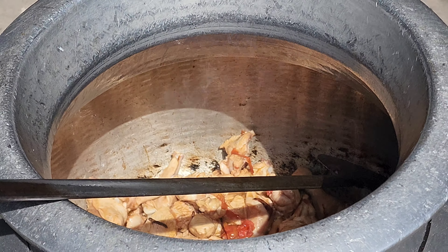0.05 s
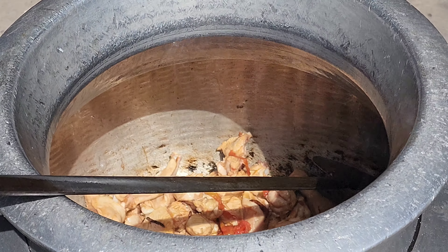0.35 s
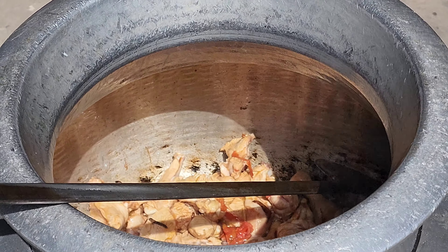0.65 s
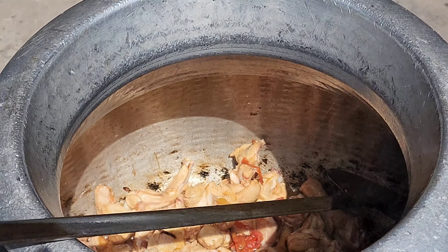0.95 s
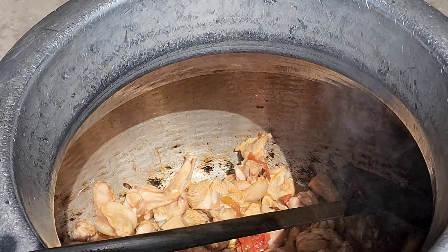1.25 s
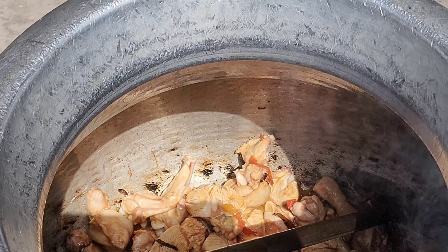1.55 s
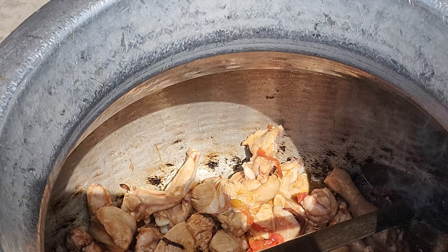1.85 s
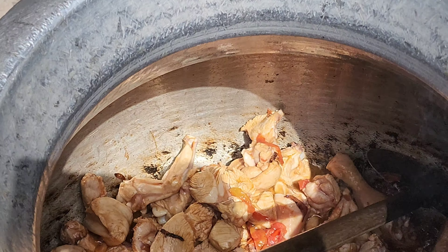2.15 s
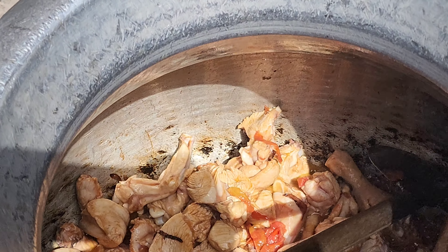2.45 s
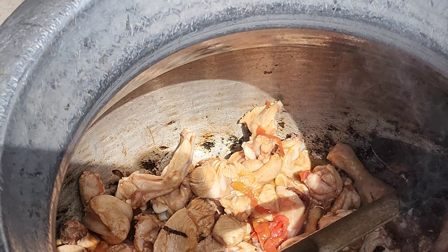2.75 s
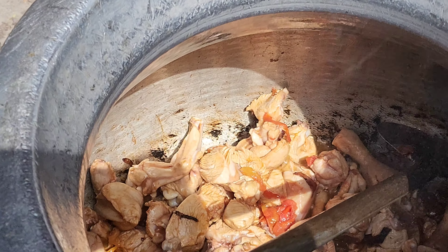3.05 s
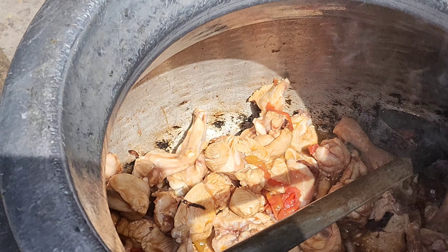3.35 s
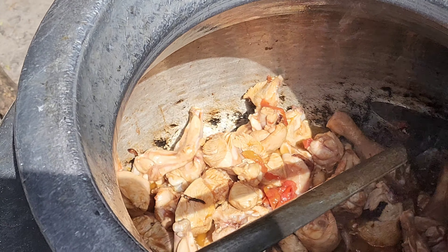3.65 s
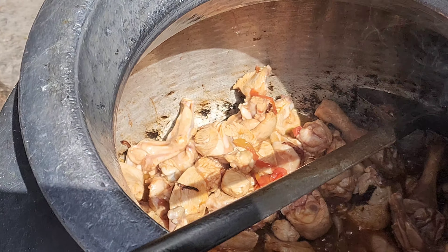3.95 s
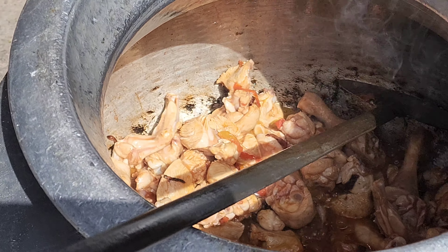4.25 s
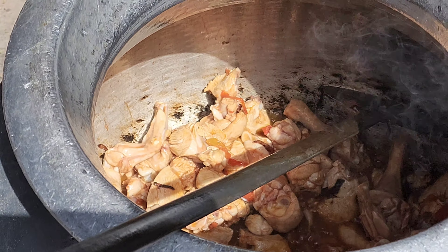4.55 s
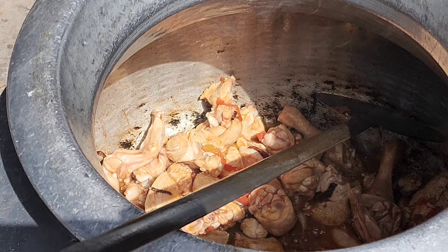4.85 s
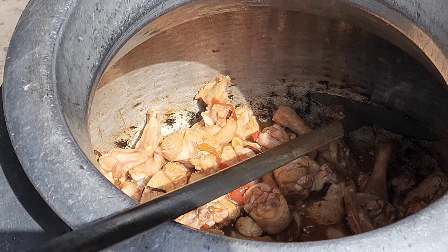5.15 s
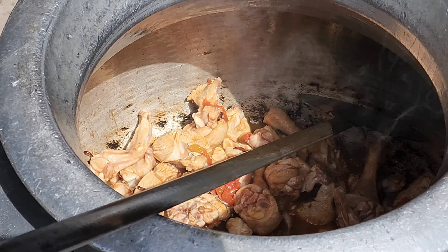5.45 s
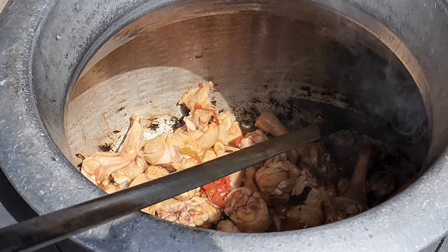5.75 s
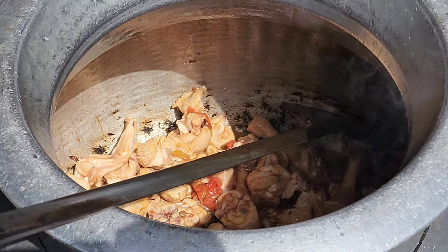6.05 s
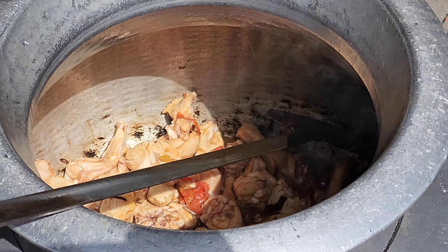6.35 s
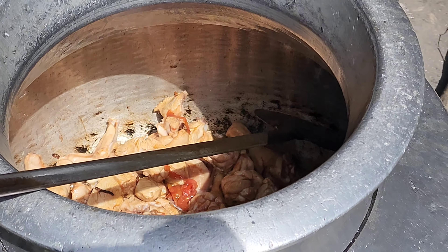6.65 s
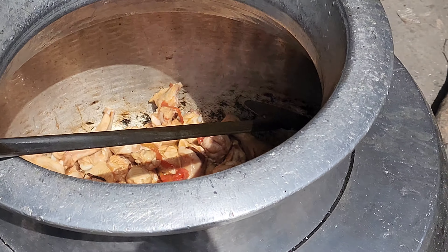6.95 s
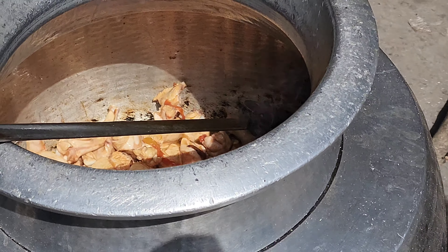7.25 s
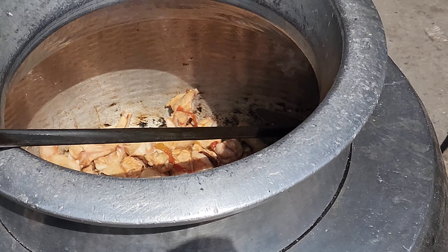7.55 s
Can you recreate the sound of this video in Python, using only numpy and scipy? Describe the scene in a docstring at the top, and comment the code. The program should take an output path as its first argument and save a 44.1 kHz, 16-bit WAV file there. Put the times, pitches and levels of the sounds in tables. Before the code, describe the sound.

Meat fries with a steady hiss and spit in a big metal pot over a rumbling gas burner, with distant engines droning.

```python
"""Frying at an outdoor stall

Meat fries in a big metal pot over a large gas burner; the microphone moves in over the rim and back.
Up close, steam bubbles in the fat hiss and spit, the flame rumbles, and the hollow of the pot rings.
A few soft bumps sound nearby. Down the street one engine drones and another slowly gathers speed."""
import sys
import numpy as np
from scipy import signal
from scipy.fft import rfft, irfft
from scipy.io import wavfile

SR = 44100
rng = np.random.default_rng(int(sys.argv[2]) if len(sys.argv) > 2 else 0)


def generate_wav(sig):
    """Save sig (samples, or channels by samples) to the path in sys.argv[1] as 16-bit PCM at SR."""
    pcm = np.round(np.clip(np.atleast_2d(sig).T, -1, 1) * 32767).astype(np.int16)
    wavfile.write(sys.argv[1], SR, pcm)


N = 344112
TIME = np.arange(N) / SR
FREQ = np.fft.rfftfreq(N, 1 / SR)
OVER_POT_S, OVER_POT_SPAN_S = 4.3, 9.3  # microphone over the pot: middle, span
IN_MOUTH_S, IN_MOUTH_SPAN_S = 2.43, 3.3  # microphone dipping into its mouth: middle, span


# The fat, loudest straight above the mouth: (time [s], hiss level [dB], relative top fizz [dB])
FRYING_LEVELS = [(0, -28, -1.5), (0.17, -29.5, -5.5), (0.25, -31.5, -10), (0.5, -29.5, -8.5),
                 (0.86, -26, -4), (1.05, -26, -3.5), (1.3, -25, -1.5), (2, -22.5, -2.5), (2.3, -22.5, -4),
                 (2.7, -22, -2.5), (3.9, -23.5, -2.5), (4.45, -25, -3.5), (4.75, -23.5, -2.5),
                 (5.2, -24.5, -2), (6.6, -25.5, -2), (6.88, -25, -9), (7.15, -28, -2), (7.45, -27, -3),
                 (7.73, -31, -7), (7.8, -28.5, -6)]
# The hiss at close range: (frequency [Hz], relative level [dB])
HISS_SPECTRUM = [(1060, -18.5), (1800, -24), (2100, -10), (2800, -0.5), (3330, 1.5), (4450, 0.5),
                 (4920, -1.9), (5590, -1.5), (6340, 0.2), (7000, -4), (7700, -7), (8500, -7), (10000, -9),
                 (10800, -9), (11450, -3.5), (15800, -5)]

def frying(hiss_db=2.0, spit_db=-6.5, fizz_db=3.5, surge_db=0.46, sputter_db=1.8):
    """Countless bubbles merge to a hiss; its top fizz sputters and beams straight out of the pot."""
    level, beam = follow(FRYING_LEVELS)
    hiss = gain_of(hiss_db) * turbulence(gain_of(read(HISS_SPECTRUM)))
    sizzle = hiss + gain_of(spit_db) * spits()
    fizz = colour(sizzle, 1 / (1 + (9500 / (FREQ + 1)) ** 6))  # above 9.5 kHz
    fizz_gain = gain_of(beam + fizz_db + sputter_db * np.tanh(waver(14)))
    return (sizzle - fizz + fizz * fizz_gain) * gain_of(level + surge_db * waver(19))


def spits(per_s=1500, spread_db=2.3, places=12):
    """Tiny steam bubbles burst in the fat; each snap scatters briefly off the metal walls."""
    size = gain_of(spread_db * np.minimum(rng.exponential(1, N), 4.3))
    bursts = size * (rng.random(N) < per_s / SR)
    place = rng.integers(0, places, N)
    age = TIME[:512]
    decay = np.exp(-age / 0.0005) + 0.14 * np.exp(-age / 0.0036)
    paths = rng.standard_normal((places, 2, len(age))) * decay
    snaps = sum(signal.oaconvolve((bursts * (place == k))[None], path, axes=1)[:, :N]
                for k, path in enumerate(paths))
    return evened(colour(snaps, gain_of(read(HISS_SPECTRUM)) * sides(read(PORT_BALANCE))))


# Steam, close and to the right: (time [s], relative level [dB], length [s], centre [Hz], width [Hz])
STEAM_SPURTS = [(0.721, -36, 0.37, 3370, 170), (2.18, -24, 0.07, 13000, 4030),
                (2.495, -30.5, 0.17, 2080, 350), (3.044, -24, 0.037, 3450, 480),
                (3.14, -24, 0.054, 13000, 4000), (3.297, -22, .04, 13000, 4000),
                (3.654, -25, 0.067, 13020, 3950), (4.72, -34, 0.28, 3700, 502),
                (5.189, -23.5, 0.08, 12900, 4020), (5.868, -32, .07, 3400, 246),
                (6.108, -30, 0.073, 3430, 297), (6.85, -36, .08, 3450, 200)]

def spurts(level_db=-1, balance_db=-5):
    """Pockets of steam escape from under the meat, each with a brief hiss of its own pitch."""
    out = np.zeros((2, N))
    for s, db, length, hz, width in STEAM_SPURTS:
        band = signal.butter(2, [hz - width / 2, hz + width / 2], "band", fs=SR, output="sos")
        steam = evened(signal.sosfilt(band, rng.standard_normal((2, N))))
        out += gain_of(db + level_db) * swell(s, length) * steam
    return sides(balance_db) * out


# Gurgles down in the pot: (time [s], relative level [dB], pitch [Hz])
LARGE_BUBBLES = [(1.624, -10, 930), (1.801, -15, 936), (2.089, -11, 960), (2.495, -11, 824),
                 (2.672, -13, 860), (2.834, -9, 864), (3.123, -8, 820), (3.229, -7, 1070),
                 (3.365, -10, 860), (3.547, -7, 820), (3.849, -12, 779), (4.076, -8, 1230),
                 (4.419, -13, 820), (4.759, -20, 1080), (6.267, -15, 1176), (6.441, -10, 1220)]

def bubbles(level_db=-14, rise_s=0.00087, ring_s=0.006, gap_s=0.004, weaker_db=-0.65, scatter=0.0505):
    """Large bubbles break in the juices, each a run of nine ever smaller plops of nearby pitch."""
    out = np.zeros(N)
    for s, db, hz in LARGE_BUBBLES:
        for k, (late, detune, phase) in enumerate(rng.uniform(-1, 1, (9, 3))):
            start = round((s + k * gap_s * (1 + late / 2)) * SR)
            part = out[start:start + SR // 5]
            age = TIME[:len(part)]
            ring = (1 - np.exp(-age / rise_s)) * np.exp(-age / ring_s)
            tone = np.sin(2 * np.pi * hz * (1 + k * scatter * detune) * age + np.pi * phase)
            part += gain_of(db + level_db + k * weaker_db) * ring * tone
    return out


# Broad colour of the air between the pot's walls: (frequency [Hz], relative level [dB])
HOLLOW_SPECTRUM = [(250, -49), (510, -10.5), (600, -6), (720, -2.5), (1000, -7.5), (1500, 1.5), (2100, 2),
                   (3000, -6.5), (5000, -15)]
# Air modes of the pot, heard at its mouth: (frequency [Hz], width [Hz], relative level [dB])
AIR_MODES = [(440, 5.9, 2), (837, 24, 8), (923, 35, 3), (1077, 25, 6), (1182, 43, 5), (1495, 45, 0.5),
             (1683, 39, -5.5), (2680, 55, -9), (3090, 51, -2), (3470, 55, -5), (3750, 50, -7)]

def hollow(level_db=-26.0, mouth_db=-23, falloff=0.88, balance_db=-0.6, boil_db=1.0, gurgle_db=3.5):
    """Boiling juices ring the air in the pot; each mode swells alone, all fade away from the mouth."""
    hiss_level, _ = follow(FRYING_LEVELS)
    walls = gain_of(read(HOLLOW_SPECTRUM))
    air = np.linalg.norm(walls) * turbulence(walls)
    for hz, width, db in AIR_MODES:
        mode = gain_of(db) * resonance(hz, width)
        ringing = turbulence(mode) * gain_of(gurgle_db * np.tanh(waver(23)))
        air += np.linalg.norm(mode) * evened(ringing)
    level = level_db + falloff * (hiss_level - mouth_db) + boil_db * waver(22)
    return gain_of(level) * sides(balance_db) * evened(air)


def pot_walls(x, echo=0.37, decay_s=0.007, positions=16):
    """Echoes between the metal walls ripple the midrange; the pattern shifts as the microphone moves."""
    midrange = colour(x, FREQ ** 2 / (FREQ ** 2 + 900 ** 2) / np.hypot(1, (FREQ / 3800) ** 2))
    position = TIME / TIME[-1] * (positions - 1)
    delay = TIME[:1536]
    echoes = np.zeros((2, N))
    for k in range(positions):
        taps = rng.standard_normal((2, len(delay))) * np.exp(-delay / decay_s) * (delay > 0.001)
        taps /= np.linalg.norm(taps, axis=1, keepdims=True)
        near = np.cos(np.pi / 2 * np.clip(position - k, -1, 1))
        echoes += near * signal.oaconvolve(midrange, taps, axes=1)[:, :N]
    return x + echo * echoes


# Peaks and dips with the microphone beside the rim, above the mouth and drawn back from the pot:
# (centre [Hz], width [Hz], left gain [dB], right gain [dB])
RIM_BANDS = [(750, 150, 3, 3), (845, 55, -1, -3.5), (1050, 210, 3.5, -1), (1600, 270, 4.5, -4),
             (1950, 250, 1.5, -1), (2670, 410, -7, 0.5), (3820, 420, -6, -2.5), (4770, 860, 6.5, -3),
             (5460, 450, 1, 1), (7300, 560, 0, 4), (11800, 2200, 3.5, -0.5)]
MOUTH_BANDS = [(587.5, 62, 4.5, 1.5), (890, 170, 2, 0.5), (1360, 280, 3.5, 0.5), (4450, 570, 3, 1.5),
               (5580, 1100, 1.7, 3.5)]
BACK_BANDS = [(2020, 1600, -1, 2.5), (3410, 102, -2, 3), (4000, 1200, -1.5, -3), (610, 120, 4, 3),
              (9600, 1940, -2, -0.5), (14940, 2400, -3, 1.5)]

def standing_waves(x, over_rim_s=1.13, draw_back_s=6.16, move_s=0.13):
    """Standing waves give the pot a different colour at each place the microphone passes."""
    def bands(rows):
        return gain_of(sum(np.array([[left], [right]]) * np.exp(-(2 * (FREQ - hz) / width) ** 2)
                           for hz, width, left, right in rows))
    beside = (1 - np.tanh((TIME - over_rim_s) / move_s)) / 2
    above = (1 - beside) * swell(IN_MOUTH_S, IN_MOUTH_SPAN_S)
    back = (1 + np.tanh((TIME - draw_back_s) / move_s)) / 2
    shaded = colour(x, bands([(2000, 2000, 0, -2.5)]))  # the right port is shaded around 2 kHz
    places = [(beside, RIM_BANDS), (above, MOUTH_BANDS), (back, BACK_BANDS)]
    return shaded + sum(near * colour(shaded, bands(rows) - 1) for near, rows in places)


# The flame, close under the pot: (frequency [Hz], relative level [dB])
RUMBLE_SPECTRUM = [(15, -20), (35, -8), (60, 0), (88, -4.5), (125, -3.5), (165, -6), (210, -13.5),
                   (320, -28.5), (600, -52)]
# The flame surges: (time [s], relative level [dB], length [s])
FLAME_SURGES = [(0.833, -23.5, 0.074), (1.354, -26, .07), (1.478, -24.5, 0.13), (1.664, -23, 0.067),
                (2.128, -18, 0.089), (2.4, -21, 0.16), (2.615, -22.5, 0.13), (2.919, -21, 0.22),
                (3.119, -27, 0.12), (3.752, -19, 0.047), (3.82, -19, 0.034), (4.374, -19.5, 0.1),
                (6.033, -21, 0.072)]
# The flame falters: (time [s], depth [dB], length [s])
FLAME_LULLS = [(1.16, -3, .05), (1.266, -4, 0.045), (1.405, -4, .04), (1.575, -6, .05), (1.873, -5, 0.057),
               (2.236, -5, 0.078), (2.72, -4, .04), (3.47, -3, 0.037), (5.094, -7, 0.062), (6.263, -6, .09)]

def burner(rumble_db=-29.0, away_db=-2.0, buffet_db=0.7, throb_hz=117.9, throb_db=-32.0,
           unrest_db=2.5, surge_db=-2.8, wobble=0.037):
    """The flame rumbles and falters; the gap under the pot throbs, and a surge locks on to its pitch."""
    over = swell(OVER_POT_S, OVER_POT_SPAN_S)
    lull = gain_of(sum(db * swell(s, length) for s, db, length in FLAME_LULLS))
    rumble_gain = gain_of(rumble_db + away_db * (1 - over) + buffet_db * waver(12))
    rumble = rumble_gain * turbulence(gain_of(read(RUMBLE_SPECTRUM)))
    throb = turbulence(resonance(throb_hz, width=18.4) ** 2)
    throb = evened(throb / np.sqrt(abs(signal.hilbert(throb[0])) ** 2 + 0.58))  # the swing saturates
    swing = gain_of(throb_db + unrest_db * waver(6.6)) * np.sqrt(over)
    surges = sum(gain_of(db + surge_db) * swell(s, length) for s, db, length in FLAME_SURGES)
    locked = evened(np.sin(2 * np.pi * cycles(throb_hz, wobble, waver_hz=12)))
    throb_gain = swing ** 2 / np.hypot(swing, surges)  # gives way to the locked tone in a surge
    return lull * (rumble + throb_gain * throb) + surges * locked


# Roar of the near flame and the street beyond: (frequency [Hz], relative level [dB])
ROAR_SPECTRUM = [(100, -9), (200, 0.5), (300, 1), (480, -3), (800, -18), (1600, -32), (4000, -18)]

def roar(flame_db=-40, away_db=-5, street_db=-38.5, nearest_s=7.1, passing_s=0.73, flutter_db=2.0):
    """The flame roars loudest at the pot's mouth; the street joins in as an engine comes near."""
    flame = gain_of(flame_db + away_db * (1 - swell(IN_MOUTH_S, IN_MOUTH_SPAN_S)))
    street = gain_of(street_db) / np.hypot(1, (TIME - nearest_s) / passing_s)
    flutter = gain_of(flutter_db * waver(15))
    return np.hypot(flame, street) * flutter * turbulence(gain_of(read(ROAR_SPECTRUM)))


# Thuds, swells, a tick and a ring, near the microphone:
# (time [s], level [dB], rise [s], decay [s], centre [Hz], spread [octaves])
NEARBY_BUMPS = [(.867, -23.5, 0.008, 0.02, 69, 0.26), (.98, -30.5, 0.04, 0.14, 257, 1.1),
                (1.12, -41, .04, 0.15, 335, 0.04), (2.017, -20, 0.0054, 0.0074, 1120, 1.6),
                (2.03, -33.5, 0.028, 0.023, 330, 0.46), (3.65, -29, 0.59, 0.51, 71.6, 0.28),
                (6.73, -31.5, 0.033, 0.1, 342, 0.69), (6.865, -28, 0.018, 0.077, 310, 0.85),
                (6.875, -23.5, 0.078, 0.12, 184, 0.16)]

def bumps():
    """Soft thuds and low swells, one short tick and one faint brief ring, each a band of noise."""
    out = np.zeros((2, N))
    for s, db, rise, decay, hz, octaves in NEARBY_BUMPS:
        envelope = np.exp(-np.maximum((s - TIME) / rise, (TIME - s) / decay))
        band = np.exp(-0.5 * (np.log2((FREQ + 1) / hz) / octaves) ** 2)
        out += gain_of(db) * envelope * turbulence(band)
    return out


# An engine down the street, a little to the left: (time [s], relative level [dB])
ENGINE_LEVELS = [(0, -45), (3.4, -37.5), (4.6, -38.5), (5.3, -31), (6.2, -31), (6.9, -31), (7.8, -32)]
# Its exhaust, heard from the stall: (frequency [Hz], relative level [dB])
EXHAUST_SPECTRUM = [(50, 0.5), (100, -2.5), (160, 8.5), (200, -5), (280, -1), (380, -7.5), (480, -6),
                    (600, -6)]
# The street booms as it drives along, and once the pot's lowest air mode picks up a high order: (time [s],
# length [s], rough pitch [Hz], relative level [dB])
ENGINE_BOOMS = [(3.5, 0.65, 87, -35), (3.68, 0.47, 138, -30.5), (4.037, 0.34, 162, -32),
                (4.754, 0.6, 151, -24), (5.09, 0.25, 442, -38), (5.234, 0.49, 106, -24),
                (5.27, 0.53, 239, -37.5), (5.454, 0.4, 135, -23), (5.578, 0.16, 274, -34.5),
                (5.72, 0.22, 167, -27), (5.883, 0.25, 255, -37.5), (6.333, 0.18, 384, -40.5),
                (6.397, 0.36, 297, -37), (6.548, 0.41, 181, -30.5), (6.917, .35, 312, -43),
                (7.0, .8, 94, -35), (7.35, 1.5, 162, -26.5), (7.677, 0.56, 133, -31)]

def accelerating_engine(cycle_hz=28.71, gain_hz_per_s=2.78, rough_rad=0.035, count=18,
                        level_db=-3.0, boom_db=-3.5, fade_db=2.5, flutter_db=1.2):
    """A far engine gathers speed and fires unevenly; as street reflections and the pot's lowest mode come into
    tune, one order after another booms."""
    level, = follow(ENGINE_LEVELS)
    speed = cycle_hz + gain_hz_per_s * (TIME - 6)  # reaches cycle_hz at 6 s
    turns = cycles(speed, wobble=0.005, waver_hz=9)
    wavers = [waver(3), waver(17.4), waver(14.4)]
    orders = np.arange(2, count)
    shares = gain_of(read(EXHAUST_SPECTRUM, orders * cycle_hz))
    out = np.zeros(N)
    for k, share in zip(orders, shares / np.linalg.norm(shares)):
        fading, flutter, jitter = np.roll(wavers, k * N // count, axis=1)  # each order wavers apart
        power = (share * gain_of(level + level_db + fade_db * fading)) ** 2
        for s, length, hz, db in ENGINE_BOOMS:
            if round(hz / np.interp(s, TIME, speed)) == k:
                power += (gain_of(db + boom_db) * swell(s, length)) ** 2
        phase = 2 * np.pi * (k * turns + rng.random()) + rough_rad * k * jitter
        out += np.sqrt(2 * power) * gain_of(flutter_db * flutter) * np.sin(phase)
    return from_left(sides(db=0.5) * out, lag_s=0.00032)


# The other engine, far down the street: (time [s], firing rate [Hz], relative level [dB])
DRONE_FIRING = [(0, 41.6, -33), (.3, 42.7, -26), (.7, 44.6, -22), (.85, 45.9, -38), (1.4, 46.83, -33),
                (2.15, 49.4, -52), (2.4, 50.43, -31), (3.75, 52.8, -29), (3.88, 54.3, -21.5),
                (4.1, 53.9, -24), (4.37, 54.2, -22), (4.55, 54.4, -25), (4.98, 54.2, -30),
                (5.08, 53.6, -42), (5.18, 54, -22), (5.42, 54.9, -26), (5.53, 55.2, -18.5),
                (5.87, 55.8, -20), (6.1, 57.4, -32), (7.8, 60.2, -37)]

def droning_engine(level_db=-4.0, balance_db=1.5, flutter_db=-0.2):
    """Only the firing rate of this engine carries to the stall: a firm, fluttering throb."""
    firing_hz, level = follow(DRONE_FIRING)
    tone = evened(np.sin(2 * np.pi * cycles(firing_hz, wobble=0.004, waver_hz=10)))
    return sides(balance_db) * gain_of(level + level_db + flutter_db * waver(12)) * tone


# Likeness of the sound at the microphone's two ports: (frequency [Hz], coherence [0-1])
PORT_COHERENCE = [(30, 0.94), (110, 1), (200, 1), (400, 0.84), (850, 0.66), (1100, 0.8), (1400, 0.26),
                  (1800, 0.43), (2400, 0.19), (3300, 0.35), (5000, 0.016), (16000, 0.017)]
# Earlier arrival at the left port: (frequency [Hz], phase lead [rad])
PORT_LEAD = [(0, 0), (110, 0), (250, .08), (400, .25), (550, .22), (850, .42), (1120, .85), (1400, 1.5),
             (1800, 2.7), (2240, 4.9), (3300, 5.9), (4400, 7.8), (16000, 28.8)]
# Level difference between the ports: (frequency [Hz], left minus right [dB])
PORT_BALANCE = [(100, 1.2), (1000, 0), (2600, 0), (3300, -2.5), (4500, -8), (6100, -7.5), (7000, -3.5),
                (7750, 0.5), (9000, 2), (10800, -3), (11500, -9), (15500, -4)]

def turbulence(gain):
    """Noise of a given colour at the two microphone ports: alike in the bass, unrelated in the treble."""
    left, unrelated = rfft(rng.standard_normal((2, N)))
    coherence = read(PORT_COHERENCE)
    lag = np.exp(-1j * np.interp(FREQ, *np.transpose(PORT_LEAD)))
    right = coherence * lag * left + np.sqrt(1 - coherence ** 2) * unrelated
    return evened(irfft(np.array([left, right]) * gain * sides(read(PORT_BALANCE)), N))


def from_left(x, lag_s):
    """A sound from the left reaches the right port later."""
    return np.array([x[0], np.interp(TIME - lag_s, TIME, x[1])])


def sides(db):
    """Left and right gains for a level difference."""
    return gain_of(np.array([[1], [-1]]) * db / 2)


def gain_of(db):
    """Decibels to amplitude."""
    return 10 ** (np.asarray(db) / 20)


def evened(x):
    """Scales a sound so that the mean of its channels has rms 1."""
    return x / np.sqrt(np.mean(np.atleast_2d(x).mean(0) ** 2) + 1e-20)


def read(points, hz=FREQ):
    """Reads a spectrum on a log-frequency axis."""
    f, value = np.transpose(points)
    return np.interp(np.log(hz + 1), np.log(f + 1), value)


def follow(rows):
    """The columns of a curve table at every sample."""
    s, *columns = np.transpose(rows)
    return [np.interp(TIME, s, column) for column in columns]


def colour(x, gain):
    """Filters a sound by a gain at every frequency."""
    return irfft(rfft(x) * gain, N)


def resonance(hz, width):
    """Response of one mode, 1 at its centre."""
    return 1 / (1 + 1j * (FREQ ** 2 - hz ** 2) / (width * FREQ + 1e-9))


def swell(s, length):
    """A smooth hump of height 1 around a moment."""
    return np.exp(-np.minimum((2 * (TIME - s) / length) ** 2, 50))


def waver(hz):
    """Slow random drift of rms 1, up to about hz changes a second."""
    return evened(colour(rng.standard_normal(N), (FREQ > hz / 8) / (1 + (FREQ / hz) ** 4)))


def cycles(hz, wobble, waver_hz):
    """Running count of cycles for a rate that wanders by the share wobble."""
    return np.cumsum(hz * (1 + wobble * waver(waver_hz))) / SR


def scene():
    """Pot, burner and street together; the pot's hollow drifts left as the microphone leaves it."""
    lag_s = np.interp(TIME, [6.1, 7], [0, 0.00014])
    air = from_left(hollow() + bubbles(), lag_s)
    rumble_and_roar = burner() + roar()
    pot = standing_waves(pot_walls(air + frying()))
    return pot + spurts() + rumble_and_roar + droning_engine() + accelerating_engine() + bumps()


def record(dry, edge_hz=15880):
    """The recorder's steep band limit."""
    lowpass = signal.firwin(801, edge_hz, window=("kaiser", 9), fs=SR)
    return signal.oaconvolve(dry, lowpass[None], "same")


dry = scene()
out = record(dry)
generate_wav(out)
```